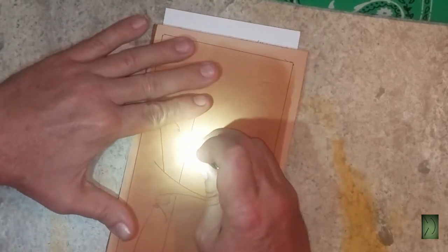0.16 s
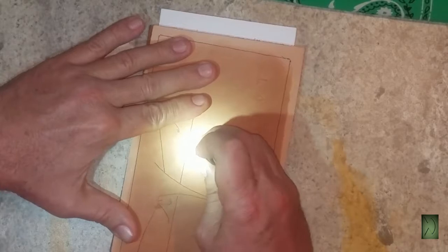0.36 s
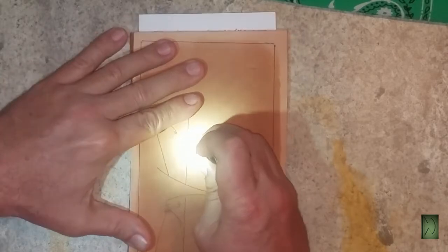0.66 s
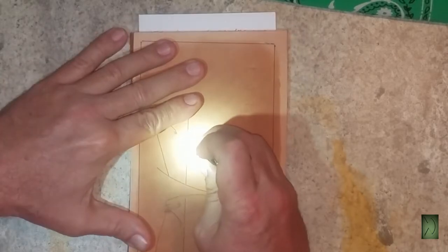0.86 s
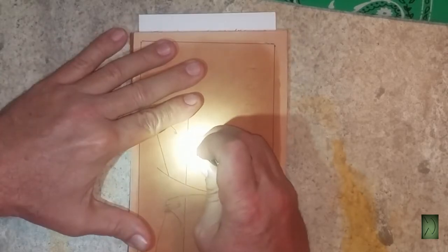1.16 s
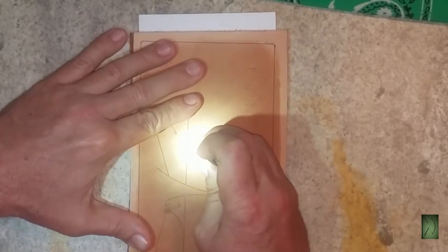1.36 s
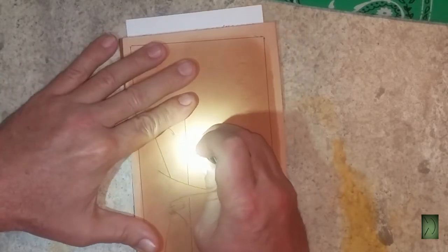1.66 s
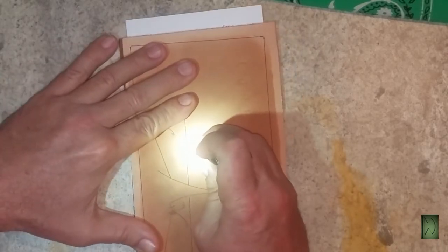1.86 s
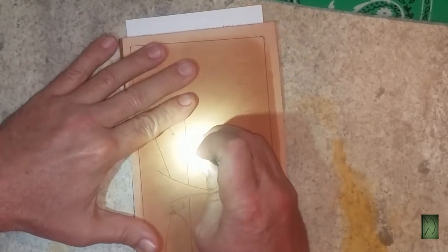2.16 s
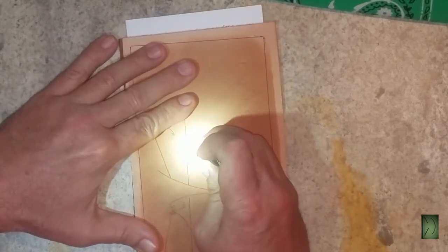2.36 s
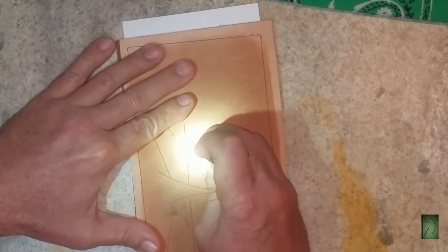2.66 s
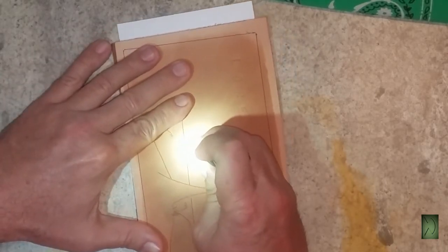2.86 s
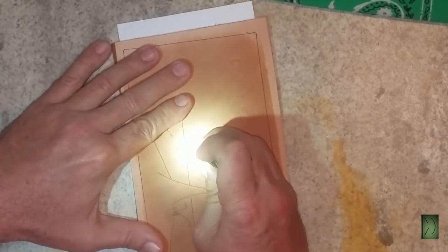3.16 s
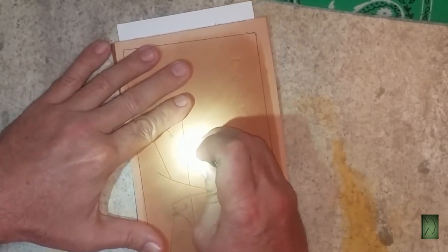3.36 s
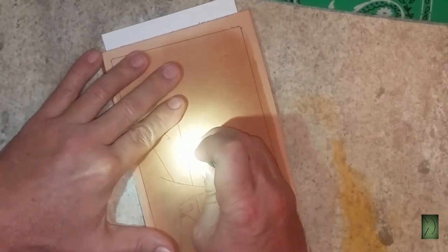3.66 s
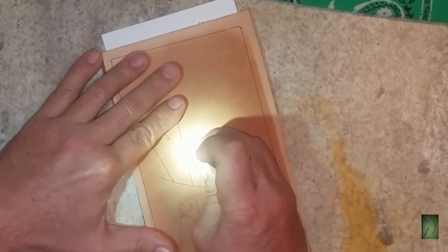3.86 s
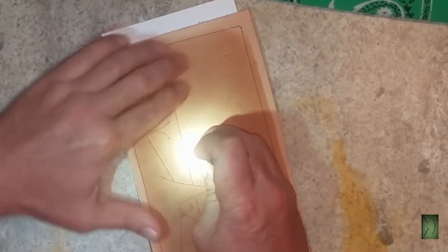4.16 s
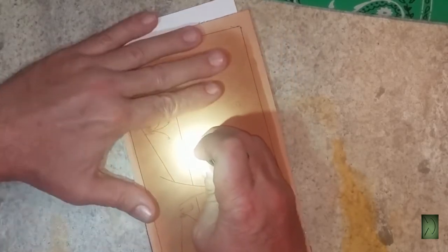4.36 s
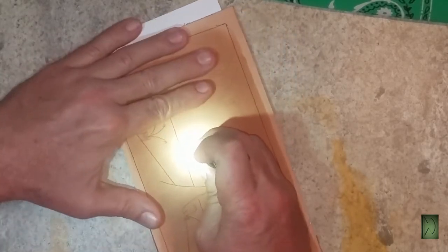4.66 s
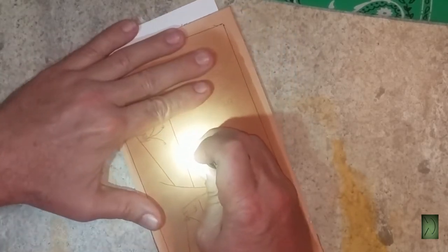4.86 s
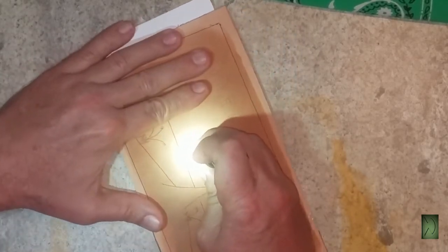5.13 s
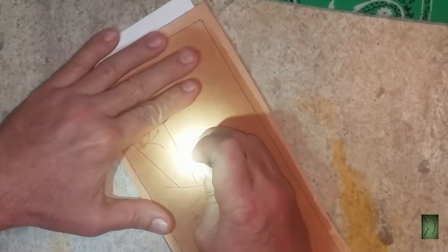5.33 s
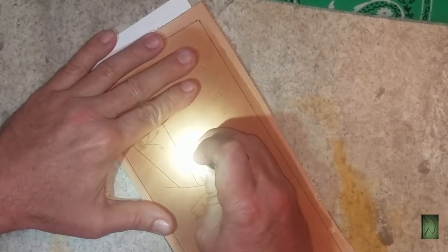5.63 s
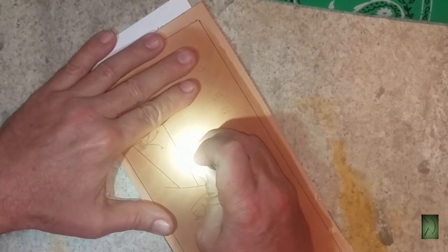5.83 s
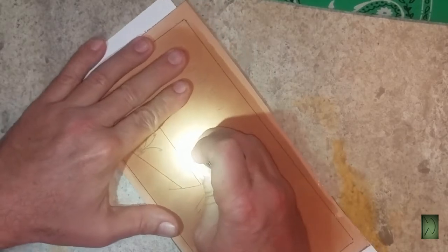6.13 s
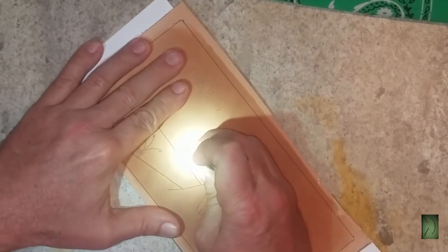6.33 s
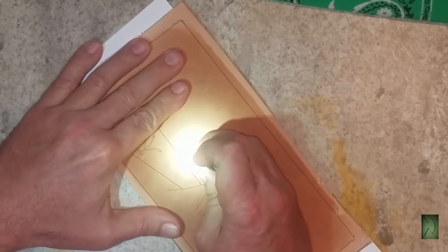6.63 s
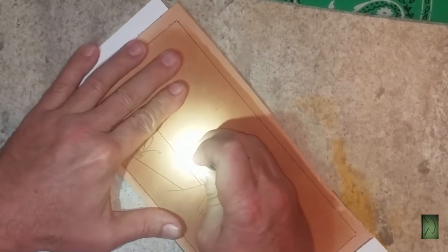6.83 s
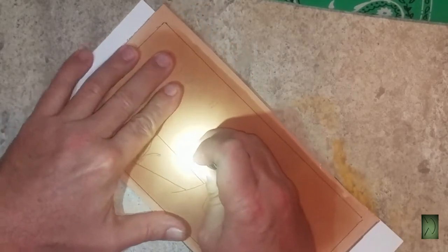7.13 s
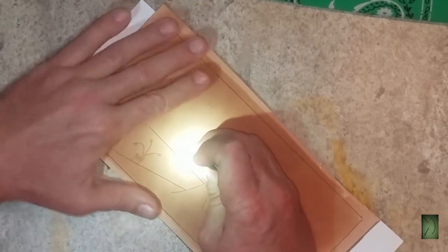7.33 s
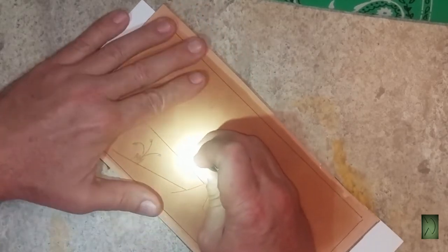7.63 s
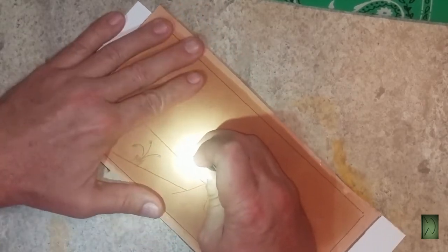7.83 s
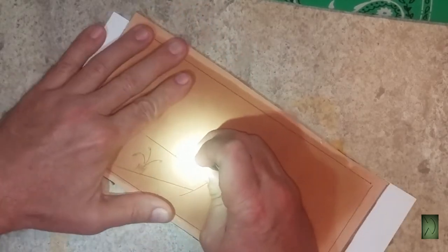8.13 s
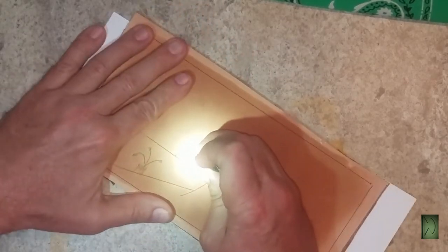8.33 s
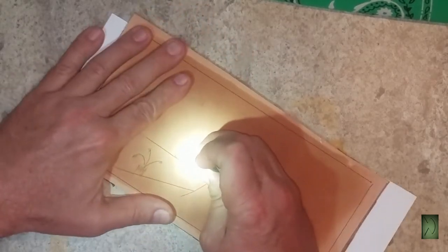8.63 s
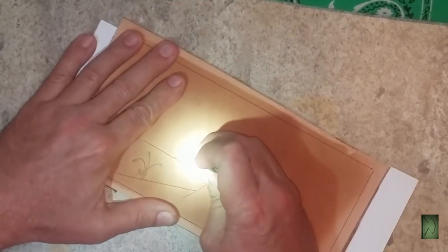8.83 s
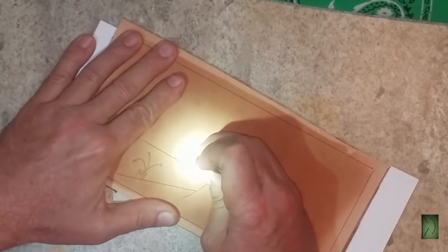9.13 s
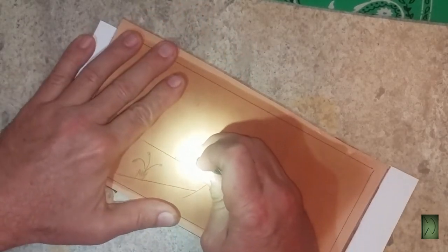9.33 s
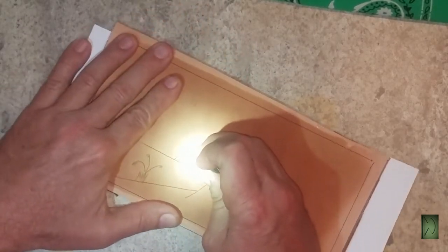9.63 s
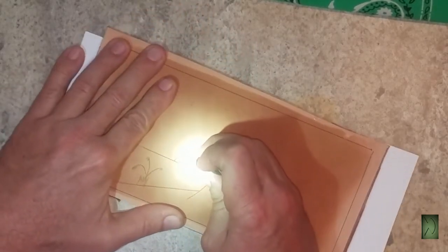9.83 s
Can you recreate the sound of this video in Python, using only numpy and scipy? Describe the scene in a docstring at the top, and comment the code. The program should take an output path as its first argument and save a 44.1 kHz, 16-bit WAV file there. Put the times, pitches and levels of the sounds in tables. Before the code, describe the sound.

A steady fan hum with rushing air runs throughout. Close by, a small blade works damp leather on a stone slab, giving light double clicks, bright tiny snaps and short gritty slides as the leather and its paper backing are turned. Dull, padded single and double knocks come through the table, leaning right. Close stereo microphone in a small workroom, quiet and a little hissy.

```python
"""A steady fan hum with rushing air opens the scene, soon joined by dull single or double knocks through a table.
Then a hand turns damp leather and its paper backing on a stone slab while a small knife cuts: scrapes, ticks, snaps.
Ticks are double clicks ringing the knife; snaps are flurries of clicks in a band; slides are two layers of coloured
grains. Knocks ring the modes of the table; the fan is tones on multiples of its speed over two layers of noise."""
import sys
import numpy as np
from scipy import signal
from scipy.fft import rfft, irfft, next_fast_len
from scipy.io import wavfile

SR = 44100
rng = np.random.default_rng(int(sys.argv[2]) if len(sys.argv) > 2 else 0)


def generate_wav(sig):
    """Save sig (samples, or channels by samples) to the path in sys.argv[1] as 16-bit PCM at SR."""
    pcm = np.round(np.clip(np.atleast_2d(sig).T, -1, 1) * 32767).astype(np.int16)
    wavfile.write(sys.argv[1], SR, pcm)


N = 440559   # length in samples

# The blade or the paper lets go:
# t/s, tick drive level/dB, tick colour f/Hz, snap peak level/dB, snap colour f/Hz
RELEASES = [(.3633, -28, 1810, -43, 13000), (.4324, -39, 1930, -29, 13000), (1.2614, -36, 1950, -35, 7000),
            (1.5706, -34, 1940, -33, 5970), (2.6136, -27, 1900, -33, 13000), (2.7177, -25, 1840, -50, 4970),
            (3.4492, -21, 2000, -35, 7000), (3.4795, -29, 1890, -44, 5000), (3.51, -28, 1900, -33, 11700),
            (4.114, -33, 2050, -31, 13000), (4.1687, -29, 1940, -36, 9000), (4.414, -27, 1960, -40, 6000),
            (4.4255, -27, 1990, -26, 9000), (4.4677, -37, 2030, -15, 20000),
            (5.0976, -23.5, 1400, -61, 4400), (5.119, -26, 1600, -50, 4400), (5.239, -30, 1950, -27, 10000),
            (6.008, -20, 1590, -33.5, 5460), (6.0933, -22, 1680, -32, 9900),
            (6.4744, -19.5, 1600, -34, 7500), (6.8894, -38, 2040, -32, 8750),
            (6.9925, -27, 1850, -28, 8000), (7.2628, -22, 2300, -25, 11500),
            (7.4708, -28.5, 1950, -35, 5000), (7.9624, -23, 1890, -36, 8200),
            (8.7948, -22, 1900, -26, 8500), (9.5173, -20.5, 1800, -31, 5500),
            (9.7005, -31, 1850, -30, 8200), (9.7022, -40, 1850, -20, 14000)]
# Modes of the knife: f/Hz, t60/s
KNIFE_MODES = [(850, 0.024), (1280, 0.022), (1620, 0.031), (1850, 0.027), (2270, 0.02), (2830, 0.015),
               (3350, 0.0051)]
# Pushes that slide leather and paper on the slab: grip t/s, turn after the grip t/s, end after the grip t/s,
# rms level/dB at the grip, at the turn and at the end, drag against hiss level/dB
PUSHES = [(.375, .21, .262, -51, -35.5, -43, -6.5), (1.557, .025, .128, -46, -44, -45, -4),
          (2.612, .005, .01, -49, -46.5, -48, 3), (3.449, .065, .19, -51, -45, -48.5, 0),
          (4.093, .022, .028, -52, -47, -47, -6), (4.167, .003, .006, -44, -44, -46.5, 2),
          (4.413, .013, .018, -50, -40.5, -42, 3.5), (4.478, .08, .17, -51, -50, -48, 0),
          (5.238, .09, .185, -43, -45, -48.5, 2.5), (6.092, .07, .12, -51, -45, -50, 2.5),
          (6.992, .025, .165, -42, -54, -55, 4.5), (7.47, .008, .014, -49, -48.5, -48.5, 9),
          (7.925, .045, .165, -51, -40, -47, 0), (8.794, .03, .08, -40.5, -48, -54, 3),
          (9.699, .035, .18, -39, -48, -56, 1.5)]
# Spectrum of the bright hiss of grit under the paper: f/Hz, relative level/dB per Hz
GRIT_SPECTRUM = [(4000, -22), (5200, -5), (6500, -5), (8200, 0), (9600, -5), (11600, 1.5), (14000, -2),
                 (16000, -4)]
# Spectrum of the dull drag of the leather: f/Hz, relative level/dB per Hz
DRAG_SPECTRUM = [(700, -11.5), (1300, -1), (1900, -1), (3000, -5.5), (5000, -11.5), (6500, -38)]
# Blows on the table: t/s, drive level/dB, heaviness dB per octave toward the bass
BLOWS = [(.0967, -23.5, 0), (1.2301, -24, 0), (2.1388, -21, .5), (2.166, -29, 1.5), (2.3447, -24, .5),
         (2.3687, -23, 3.5), (2.3891, -28, 9.5), (2.4116, -26, 6.5), (3.1821, -23, 1), (3.927, -20.5, .5),
         (3.9853, -28, 5.5), (4.4164, -30, 5), (4.424, -25, 0), (4.9728, -18, 1), (5.0988, -25, -3),
         (5.6838, -25, 0), (5.8423, -22.5, 2.5), (5.8672, -25, .5), (5.8971, -25, 4), (6.4755, -29, -4),
         (6.5106, -21.5, 1.5), (6.7551, -20, 1), (7.4737, -24.5, 1), (7.494, -24, 2), (7.658, -21.5, 3.5),
         (7.6819, -22.5, .5), (7.7135, -23.5, 5.5), (8.385, -27, 1.5), (8.5104, -21.5, 0),
         (8.5385, -28, -.5), (9.1955, -20, 1.5), (9.3796, -22.5, 1.5), (9.4043, -22, 4)]
# Modes of the table: f/Hz, relative level/dB, t60/s, direction of swing at the struck spot (+1 or -1)
TABLE_MODES = [(85, -12.5, .5, 1), (145, -7.5, .105, 1), (167, -.7, .085, -1), (204, -13, .147, -1),
               (221, -19, .256, 1), (295, -7.5, .026, -1), (354, -6.5, .116, 1), (413, -9.5, .102, 1),
               (462, -19, .193, 1), (579, -12, .071, -1), (652, -23, .119, -1)]
# Motor speed of the fan: t/s, turns per second
MOTOR_SPEED = [(.5, 47.358), (2.5, 47.34), (4.5, 47.362), (5.5, 47.4), (6.5, 47.402), (8.5, 47.32),
               (9.99, 47.31)]
# Tones of the fan: multiple of the speed, rms level/dB, left-right level/dB, left lead/rad
MOTOR_TONES = [(1, -54, -2.8, 0), (3, -56, -3.7, 0), (6, -63, -2.1, -.1), (7, -42.5, -6.4, -.1),
               (8, -53, -5.7, -.2), (9, -58, -3.3, -.9), (14, -50, -5, 1.8), (21, -57, -4.5, -2.2),
               (35, -65, -6.2, -.6), (36, -64, -2.7, .4), (38, -61, -12.8, -.8), (40, -58, -9.8, 1.1),
               (41, -53, -4.2, .1), (42, -56, 4.3, 2.9), (46, -66, -3, 0), (52, -67, -4.5, -.4),
               (54, -70, 3.3, .8)]
# Air in the room: f/Hz, relative level/dB per Hz
RUMBLE_SPECTRUM = [(18, -33), (30, -12), (48, -12.5), (91, -4.5), (152, -7), (243, -16.5), (276, -14),
                   (305, -7), (332, -6.5), (378, -10.5), (455, -7.5), (502, -15.5), (658, -6.5),
                   (748, -13.5), (900, -16.5), (1170, -49), (1980, -120)]
# Air at the blades and microphone hiss: f/Hz, relative level/dB per Hz
RUSH_SPECTRUM = [(530, -11), (900, -8), (990, -2.5), (1300, -7), (1520, -5.5), (1800, -6), (1890, -4.5),
                 (1980, 0.5), (2320, -8), (4210, -19.5), (6480, -25.5), (7940, -23.5), (9270, -26.5),
                 (14300, -18), (15700, -18)]
# Stereo width of the noise layers: f/Hz, left-right likeness (0-1)
STEREO_LIKENESS = [(60, .87), (170, 0.78), (260, 0.27), (340, 0.92), (520, 0.53), (690, 0.78), (950, 0),
                   (1460, 0.14), (2010, 0.48), (3330, 0.06), (6800, 0.04), (7000, 1), (16000, 1)]
# Stereo balance of the noise layers: f/Hz, left-right level/dB
STEREO_BALANCE = [(60, -1.5), (130, -3.5), (290, -3), (640, -1), (1410, -2), (3100, -2), (6820, -1),
                  (15000, 0)]
# Stereo phase of the noise layers: f/Hz, left lead/rad
STEREO_LEAD = [(500, 0), (600, .9), (700, 1.1), (780, .3), (900, 0)]
# Standing waves that dent or lift the noise layers: centre f/Hz, width at half the dB f/Hz, level/dB
ROOM_WAVES = [(353, 38, -2), (503, 27, -5), (630, 20, 3), (646, 16, -3.5), (860, 20, -4), (910, 43, -3.5),
              (1055, 54, -3), (1133, 70, -3), (1346, 32, -2.5), (1459, 32, 2), (1525, 60, -3),
              (1626, 22, -2), (1825, 24, -3), (1863, 32, -2), (1973, 27, -3), (2040, 30, 3.5),
              (2076, 26, -6), (2130, 38, -2.5), (2250, 75, -2.5), (2600, 65, -2.5), (2732, 38, 2.5),
              (2805, 86, -2), (2896, 43, 4), (3023, 48, -2.5), (3128, 75, -2.5), (3819, 124, -2.5)]

SNAP_T60_S = .018
SNAP_WIDTH = 1.5   # band edges lie this factor below and above the snap colour
GRIP_DB_PER_S, STOP_DB_PER_S = 2500, 332   # how fast a push swells and dies
CONTACT_HZ = 800   # low-pass of the padded contact
RUMBLE_DB, RUSH_DB = -39.5, -40.5   # rms
WHINE_HZ, WHINE_DB = 1091.4, -61   # a thin tone that does not follow the fan; rms
OFFSET = -.0071   # constant added before the top is cut, full scale 1
CUTOFF_HZ = 15750


def ticks():
    """Each release clicks twice into the modes of the knife, those near its colour strongest; the paper snaps."""
    s, tick_db, tick_hz = np.transpose(RELEASES)[:3]
    at = np.round(s * SR).astype(int)
    gap_s = rng.uniform(0.00309, .006, len(at))
    again = at + (gap_s * SR).astype(int)
    out = np.zeros((2, N))
    chance_db = rng.normal(0, 1.7, (len(at), len(KNIFE_MODES), 2))
    for k, (hz, t60) in enumerate(KNIFE_MODES):
        octaves_off = abs(np.log2(hz / tick_hz))
        strength = from_db(tick_db - 8 - 11.2 * octaves_off + chance_db[:, k].T)
        clicks = np.zeros((2, N))
        clicks[:, at] = strength * (-1) ** k   # neighbouring modes start in opposite directions
        clicks[:, again] = strength * from_db(-5.5)
        out += ring(clicks, hz, t60)
    for start, (*_, snap_db, snap_hz) in zip(at, RELEASES):
        sound = from_db(snap_db) * snap(snap_hz, SNAP_T60_S)
        out[:, start:start + sound.shape[1]] += sound
    return out


def snap(hz, t60):
    """A sharp click and a dying flurry ring a broad resonance, a little unlike in the two channels; peak 1."""
    t = np.arange(round(.06 * SR)) / SR
    chosen = rng.random(len(t)) < 3500 / SR   # 3500 clicks per second on average
    flurry = rng.standard_normal((3, len(t))) * chosen * from_db(-60 * t / t60 - 3.0)
    clicks = flurry[0] + .6 * flurry[1:]   # a shared part plus one of its own for each channel
    clicks[:, 0] = rng.uniform(1.2, 1.8, 2)
    edges = np.clip([hz / SNAP_WIDTH, hz * SNAP_WIDTH], 50, CUTOFF_HZ)
    band = signal.sosfilt(signal.butter(3, edges, "band", fs=SR, output="sos"), clicks)
    return band / abs(band).max()


def slides():
    """Dense grit under the paper hisses; the leather itself drags with a duller sound."""
    t, bright, dull = np.arange(N) / SR, np.zeros(N), np.zeros(N)
    for s, turn, length, *levels_db, drag_db in PUSHES:
        near = slice(round((s - .1) * SR), round((s + length + .2) * SR))
        age = t[near] - s
        level_db = np.interp(age, [0, min(turn, length), length], levels_db)
        level_db += GRIP_DB_PER_S * np.minimum(age, 0)
        level_db -= STOP_DB_PER_S * np.maximum(age - length, 0)
        bright[near] += from_db(level_db)
        dull[near] += from_db(level_db + drag_db)
    uneven = from_db(0.87 * drift(40) + 0.56 * drift(130))   # the paper sticks and slips
    grit = coloured(GRIT_SPECTRUM, grains(9000, spread_db=2.0), grains(9000, spread_db=3.0))
    drag = coloured(DRAG_SPECTRUM, grains(3000, spread_db=3.0), grains(3000, spread_db=2.0))
    return uneven * (bright * grit + dull * drag)


def knocks():
    """Each padded blow rings the modes of the table; heavy blows favour the low ones."""
    s, blow_db, heavy_db = np.transpose(BLOWS)
    at, out = np.round(s * SR).astype(int), np.zeros(N)
    chance_db = rng.normal(0, 1, (len(at), len(TABLE_MODES)))
    for k, (hz, level_db, t60, swing) in enumerate(TABLE_MODES):
        tilt_db = -heavy_db * np.log2(hz / 160)
        blows = np.zeros(N)
        blows[at] = swing * from_db(blow_db + level_db + chance_db[:, k] + tilt_db)
        out += ring(blows, hz, t60)
    soft = signal.butter(2, CONTACT_HZ, fs=SR, output="sos")   # a padded contact has no sharp edge
    return signal.sosfilt(soft, out) * from_db([[-2.0], [2.0]])   # leans to the right


def fan():
    """Steady tones on multiples of the motor speed, each wavering a little, over rushing air and a thin whine."""
    t = np.arange(N) / SR
    s, speed = np.transpose(MOTOR_SPEED)
    turns = np.cumsum(np.interp(t, s, speed)) / SR
    out = from_db(RUMBLE_DB) * coloured(RUMBLE_SPECTRUM, *rng.standard_normal((2, N)))
    rush_level = from_db(RUSH_DB + 0.4 * drift(3.9))
    out += rush_level * coloured(RUSH_SPECTRUM, *rng.standard_normal((2, N)))
    out += np.sqrt(2) * from_db(WHINE_DB) * np.sin(2 * np.pi * WHINE_HZ * t)
    for multiple, level_db, pan_db, lead in MOTOR_TONES:
        phase = 2 * np.pi * (multiple * turns + rng.random()) + .12 * drift(3)
        height = np.sqrt(2) * from_db(level_db + .8 * drift(4))   # sqrt(2) turns rms into peak
        out[0] += height * from_db(pan_db / 2) * np.sin(phase + lead / 2)
        out[1] += height * from_db(-pan_db / 2) * np.sin(phase - lead / 2)
    return out


def ring(clicks, hz, t60):
    """A two-pole resonator: a unit click sets a dying sine of starting height 1 ringing."""
    r, w = from_db(-60 / (t60 * SR)), 2 * np.pi * hz / SR
    return signal.lfilter([0, np.sin(w)], [1, -2 * r * np.cos(w), r * r], clicks + 1e-18)


def grains(per_s, spread_db):
    """Random clicks of uneven size and either sign, per_s of them a second on average."""
    sizes = from_db(spread_db * np.minimum(rng.exponential(1, N), 4)) * rng.choice([-1, 1], N)
    return sizes * (rng.random(N) < per_s / SR)


def coloured(spectrum, mid, side):
    """Two unrelated noises become a stereo sound with the given spectrum, heard through the room; rms 1."""
    size = next_fast_len(N)
    hz = np.arange(size // 2 + 1) * SR / size
    alike = np.clip(at_hz(STEREO_LIKENESS, hz), 0, 1)
    side_gain = np.sqrt((1 - alike) / (1 + alike))
    both = rfft(mid, size) + side_gain * rfft(side, size) * [[1], [-1]]
    low = hz[hz < 5000]   # the standing waves all lie below this
    room_db = np.zeros(len(hz))
    for centre, width, db in ROOM_WAVES:
        room_db[:len(low)] += db * 16. ** -(((low - centre) / width) ** 2)
    half = np.array([[.5], [-.5]])   # each channel takes half of a left-right difference
    gain = from_db(at_hz(spectrum, hz) + room_db + at_hz(STEREO_BALANCE, hz) * half)
    turn = np.exp(1j * at_hz(STEREO_LEAD, hz) * half)
    return rms_one(irfft(both * gain * turn, size)[:, :N])


def drift(rate):
    """Slow chance of rms 1: noise smoothed by two equal poles at rate Hz, drawn every 40 samples."""
    r = np.exp(-80 * np.pi * rate / SR)
    slow = signal.lfilter([1], [1, -2 * r, r * r], rng.standard_normal(N // 40 + 2002))[2000:]
    return np.interp(np.arange(N) / 40, np.arange(len(slow)), rms_one(slow))


def at_hz(points, hz):
    """A frequency table read on a log-frequency axis."""
    table = np.array(points)
    return np.interp(np.log(hz + 1), np.log(table[:, 0]), table[:, 1])


def rms_one(x):
    """Scaled to rms 1."""
    return x / np.sqrt(np.mean(x ** 2) + 1e-20)


def from_db(db):
    """Gain of a level in dB."""
    return 10 ** (np.asarray(db) / 20)


def scene():
    """Ticks, slides, knocks and fan together."""
    return ticks() + slides() + knocks() + fan()


def record(dry):
    """A small steady offset is added, then a steep low-pass cuts the top."""
    low_pass = signal.ellip(12, .5, 60, CUTOFF_HZ, fs=SR, output="sos")   # .5 dB ripple, 60 dB down
    return signal.sosfilt(low_pass, dry + OFFSET)


dry = scene()
out = record(dry)
generate_wav(out)
```